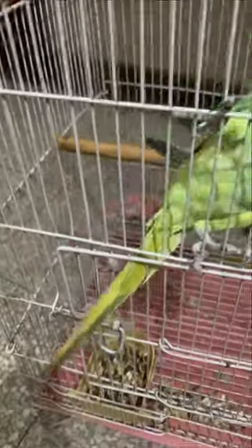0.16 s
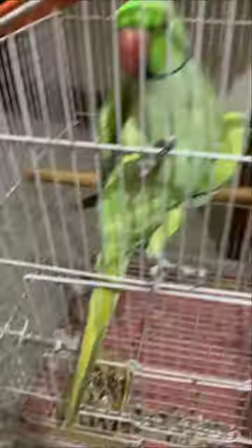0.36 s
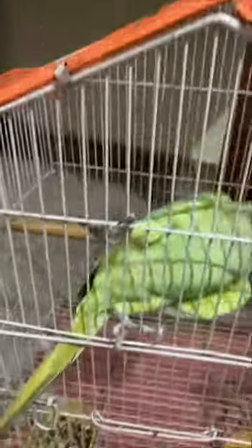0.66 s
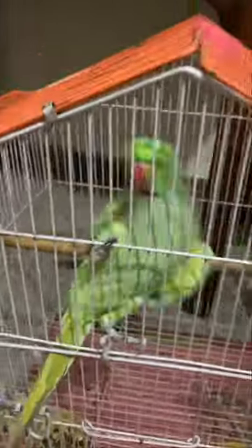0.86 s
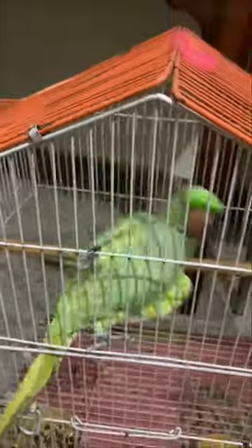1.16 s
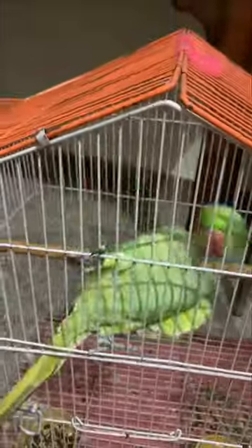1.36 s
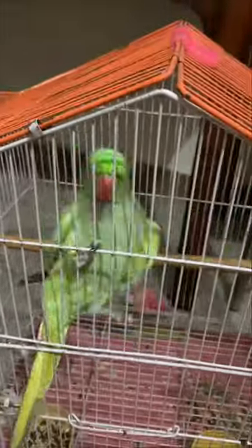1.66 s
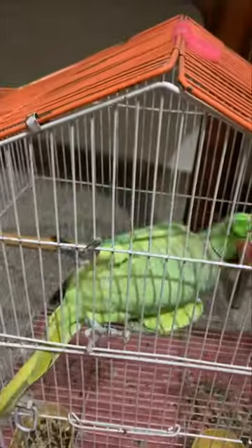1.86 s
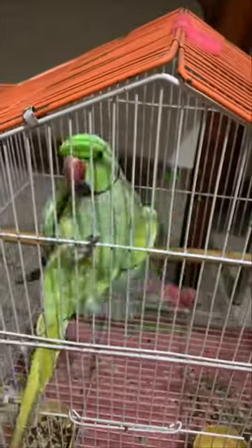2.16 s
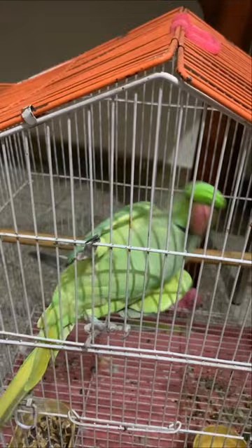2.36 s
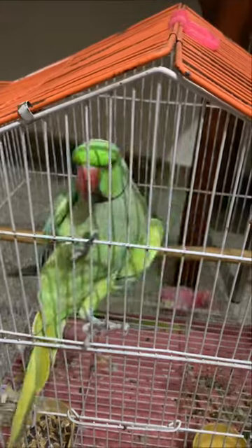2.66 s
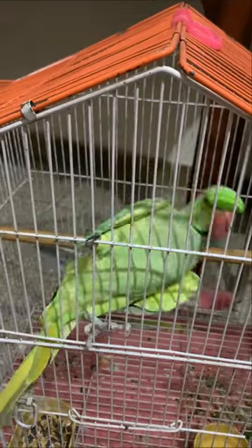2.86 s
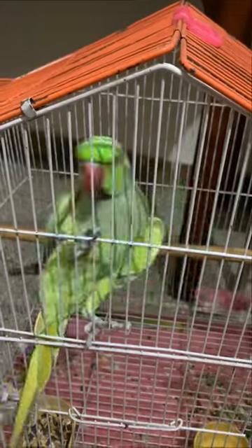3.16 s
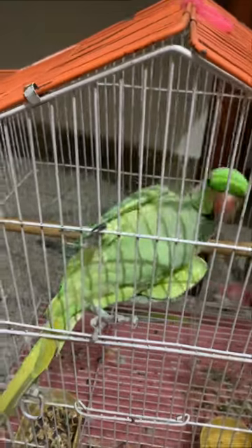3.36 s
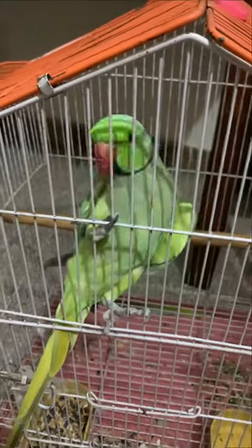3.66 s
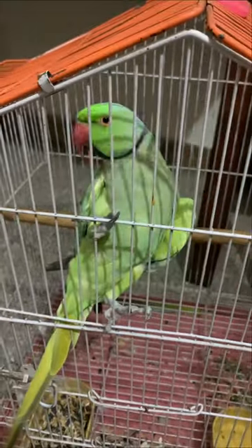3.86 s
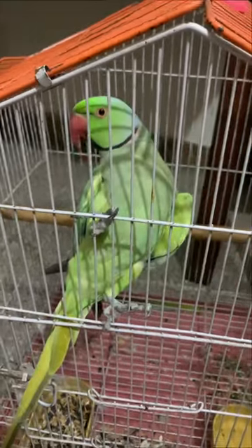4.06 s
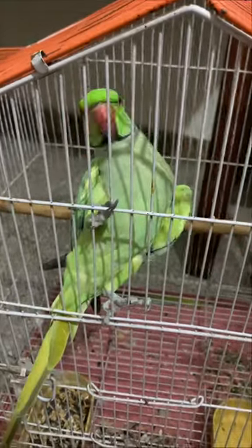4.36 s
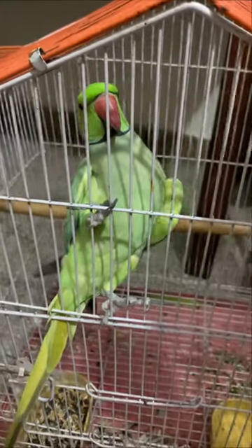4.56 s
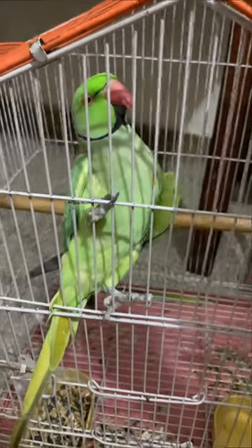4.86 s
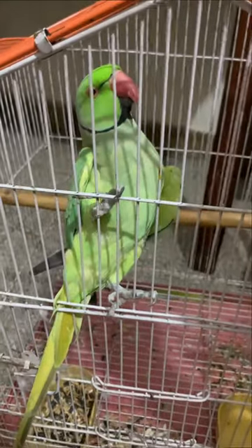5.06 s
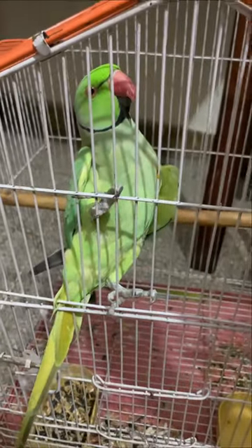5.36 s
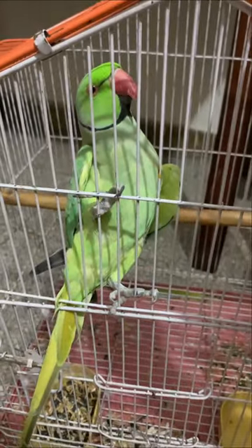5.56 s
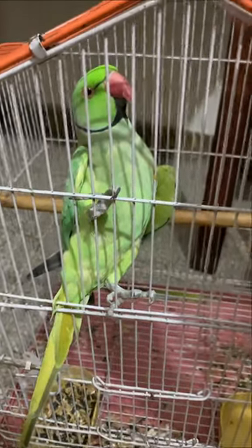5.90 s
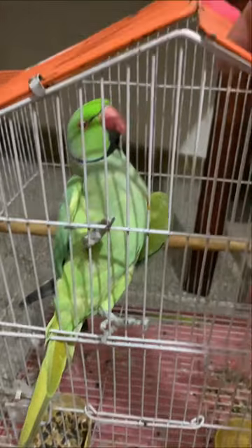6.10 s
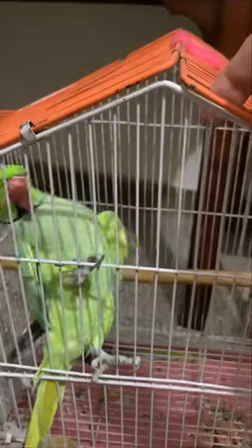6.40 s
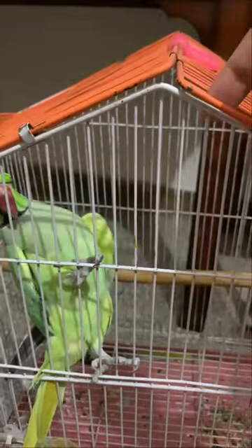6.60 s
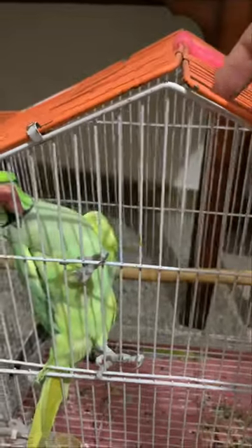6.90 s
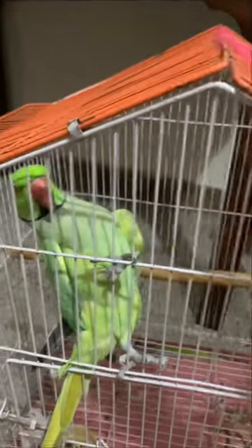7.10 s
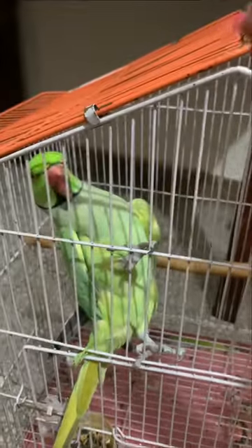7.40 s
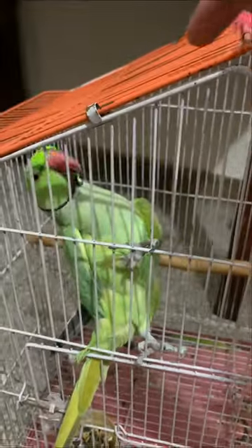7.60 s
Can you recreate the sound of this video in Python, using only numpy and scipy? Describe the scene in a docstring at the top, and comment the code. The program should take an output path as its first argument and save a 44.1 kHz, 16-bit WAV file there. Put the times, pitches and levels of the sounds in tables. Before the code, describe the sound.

Three loud, close parakeet screeches indoors, with a farther bird peeping and whistling quickly and a fan softly humming.

```python
"""A fan rushes low in a room. A distant bird peeps faintly, then whistles rows of flicked, arching,
near-pure notes. A caged parakeet screeches three times close to a phone: each cry opens with a cluck
of a few rough pulses, then glides as overtones shaped by the throat and combed by a wall echo.
The phone's gain control ducks under the cries and creeps back."""
import sys
import numpy as np
from scipy import signal
from scipy.fft import rfft, irfft, next_fast_len
from scipy.io import wavfile
from scipy.ndimage import uniform_filter1d, map_coordinates

SR = 44100
rng = np.random.default_rng(int(sys.argv[2]) if len(sys.argv) > 2 else 0)


def digitize_waveform(pressure):
    """Quantize a signal to 16-bit integers and store it at the path in sys.argv[1].

    Rows of a 2-D input are taken as channels; values are limited to [-1, 1].
    """
    field = np.atleast_2d(pressure).T
    bounded = np.clip(field, -1, 1)
    quanta = np.round(bounded * 32767).astype(np.int16)
    wavfile.write(sys.argv[1], SR, quanta)


N = 341334
TIME = np.arange(N) / SR

# fan air noise: f/Hz, density/dB
FAN_SPECTRUM = [(15, -55), (25, -19.5), (64, -7.5), (143, -10), (171, -10), (337, 1), (448, -11),
                (754, -20), (953, -16), (1520, -21), (2490, -29.5), (3070, -33), (5030, -44.5),
                (8250, -34.5), (12500, -79), (16200, -110), (22000, -120)]
# fan motor lines: f/Hz, level/dB
MOTOR_LINES = [(76, -58), (145, -54.5)]
# fan power common to both microphone ports: f/Hz, share
FAN_COHERENCE = [(60, .94), (130, .97), (300, .98), (640, .55), (1400, .55), (3100, .3), (6800, .7),
                 (12000, .7)]
# balance of that common part: f/Hz, left-right/dB
FAN_BALANCE = [(60, -0.5), (150, -2.5), (380, -4.0), (950, -5.5), (2380, -2.0), (5980, 0.0), (15000, 0.0)]
# port phase, fan and whistle overtones: f/Hz, left lead/rad
FAR_PHASE = [(0, 0), (400, .2), (1640, -.2), (2840, 2.2), (4050, 1.6), (5430, 3.3), (8000, 6.3),
             (16000, 12.6)]
# rising peeps: t/s, length/s, from/Hz, to/Hz, level/dB
PEEP_NOTES = [(0.344, 0.067, 2730, 3500, -62.5), (0.628, 0.074, 2840, 3400, -58.5),
              (1.075, .045, 2660, 3400, -62), (1.325, 0.068, 2920, 3290, -58.5),
              (4.572, 0.06, 2700, 3200, -62.5)]
# whistles: t/s, length/s, entry/Hz, crest/Hz, crest time/length, entry/dB, crest/dB, closing/dB,
# effort/dB, left-right/dB, left lead/rad, flick/dB, squeak/dB (None = not sung)
WHISTLE_NOTES = [ (1.485, 0.11, 2154, 3155, 0.42, -36.5, -48.5, -25.5, -24, -1, 0.97, -52, None),
                 (1.678, .095, 2795, 2918, 0.24, -26, -23.5, -28.5, -24, -2, 1.5, -43, None),
                 (1.851, .108, 2845, 3110, 0.44, -17, -31.5, -16, -22.5, -4, 3.5, -39.5, None),
                 (2.0, .11, 2800, 3102, .4, -30, -28, -31, -18.5, -3.7, 4.5, None, None),
                 (2.413, 0.15, 2800, 3064, 0.37, -34, -22, -33, -21.5, -5, 5, None, None),
                 (4.725, .09, 2204, 2690, 0.6, -29.5, -41, -35, -32, 2.6, 0.7, -51, -42),
                 (4.9, .098, 2677, 2825, 0.45, -29, -27, -28.5, -29.5, -0.5, 0.4, -42.5, -41),
                 (5.085, 0.092, 2820, 2886, 0.42, -31.5, -29, -31, -27.5, 1, 0.1, -42.5, -37.5),
                 (5.255, 0.1, 2825, 2970, 0.32, -34, -24, -32.5, -26, .5, 0.2, -38.5, -39),
                 (5.44, 0.089, 2910, 3015, 0.26, -31.5, -23.5, -30.5, -26, .6, 0.3, -38, -39),
                 (5.622, 0.093, 2960, 3050, 0.37, -27.5, -25.5, -28.5, -27.5, .6, -1, -36.5, -52),
                 (5.806, 0.11, 3010, 3150, .32, -26.5, -28.5, -30.5, -29.5, -1.5, -1.2, -38, -48),
                 (6.0, .094, 3030, 3165, 0.49, -29.5, -27, -32.5, -30.5, -8, 3.5, -39.5, -48),
                 (6.194, 0.076, 3140, 3248, 0.28, -27, -29.5, -30, -30, -2, 3, -38.5, -40.5),
                 (6.386, 0.091, 3156, 3205, 0.32, -30, -27.5, -35, -29, -.5, 2.5, -36.5, -35),
                 (6.581, 0.074, 3180, 3180, 0.093, -30.5, -33, -35, -27.5, .2, 2.5, -33.5, -45),
                 (6.766, 0.08, 3190, 3194, .25, -37.5, -31.5, -34.5, -27, -.2, 2.2, -35.5, -44.5),
                 (6.937, 0.099, 3150, 3690, .28, -39, -36.5, -34.5, -42, -2.5, -1.1, None, None), ]
# whistle overtones: multiple, level/dB
WHISTLE_OVERTONES = [(2, -27), (3, -42.5)]
# whistle breath: f/Hz, density/dB
BREATH_SPECTRUM = [(1800, -29.5), (3200, 1.5), (4200, -4), (5000, -9), (6200, -14.5), (8500, -16.5),
                   (10500, -24.5), (11500, -57)]
# throat clucks: t/s, level/dB, length/s, pulse rate/Hz
CLUCK_EVENTS = [(2.008, -2, 0.0069, 1471), (2.472, 7, 0.0081, 1428), (2.9543, 2.5, 0.0078, 1440)]
# air puff of a cluck: f/Hz, density/dB
PUFF_SPECTRUM = [(300, -31), (700, -7.5), (4300, 1.5), (10000, -9.5), (14000, -31.5)]
# throat, beak and microphone response: f/Hz, gain/dB
THROAT_GAIN = [(900, -38.5), (1350, -27), (1900, -33.5), (2300, -28), (2800, -20), (3500, -15), (4350, -20),
               (4950, -35.5), (5900, -25.5), (6800, -25.5), (7350, -36), (8800, -26), (10800, -34),
               (11400, -58.5), (12800, -41.5), (14800, -60.5)]
# one contour per cry: t/s, pitch/Hz, effort/dB
CRY_CONTOURS = [
    [(2.052, 1332, 0), (2.061, 1187, -3), (2.079, 1188, -5.5), (2.087, 1219, 0.5), (2.108, 1524, 1.5),
     (2.147, 1624, 1), (2.166, 1712, 0), (2.21, 1758, 0.5), (2.296, 1632, -4.5), (2.306, 1530, -9),
     (2.317, 1220, -24.5)],
    [(2.505, 1255, 0), (2.51, 1160, 6.5), (2.529, 1413, 7), (2.552, 1585, 5), (2.612, 1788, 4),
     (2.649, 1826, 5), (2.734, 1768, -4.5), (2.754, 1630, -9), (2.761, 1387, -19)],
    [(2.993, 1390, -11), (3.003, 1250, -3), (3.028, 1540, 4), (3.038, 1622, 7), (3.133, 1826, 4.5),
     (3.178, 1752, 2.5), (3.225, 1656, 1), (3.233, 1590, -7), (3.243, 1186, -19.5)],
]
# nearest wall's echo: f/Hz, gain/dB
WALL_GAIN = [(1000, -17.5), (1800, -14.5), (3500, -9), (5000, -9.5), (9000, -15)]
# port balance, parakeet: f/Hz, left-right/dB
NEAR_BALANCE = [(1050, -4), (1700, -0.5), (2250, -4), (2600, -11.5), (3150, -11), (3700, -2.5), (4200, 9),
                (4700, 8.5), (5300, -7.5), (5900, 0)]
# port phase, parakeet: f/Hz, left lead/rad
NEAR_PHASE = [(0, 0), (1000, .3), (2100, .2), (2850, -3.5), (3450, -2.4), (4050, -4.2), (8250, 0),
              (16000, 6.3)]
# room decay before scaling: f/Hz, t60/s
ROOM_T60 = [(300, 0.56), (3500, .5), (6000, 0.27), (9000, 0.34), (14000, 0.05)]


def amp(db):
    return 10 ** (np.asarray(db) / 20)


def unit(x):
    return x / np.sqrt(np.mean(x ** 2) + 1e-20)


def along(points, hz):
    """Table lookup on a log frequency axis."""
    f, v = np.transpose(points)
    return np.interp(np.log(hz + 1), np.log(f + 1), v)


def wobble(rate_hz):
    """Smooth random curve, knots at rate_hz."""
    return map_coordinates(rng.standard_normal(int(N * rate_hz / SR) + 4), [TIME * rate_hz])


def filtered(x, response):
    """Apply a complex frequency response."""
    m = next_fast_len(N + 8192)
    return irfft(rfft(x, m) * response(np.fft.rfftfreq(m, 1 / SR)), m)[..., :N]


def coloured(spectrum):
    """Shaped noise, rms 1."""
    return unit(filtered(rng.standard_normal(N), lambda hz: amp(along(spectrum, hz))))


def ports(x, balance, lead):
    """Two microphone ports: level and phase differ with frequency."""
    half = lambda hz: amp(along(balance, hz) / 2) * np.exp(.5j * np.interp(hz, *np.transpose(lead)))
    return filtered(x, lambda hz: np.array([half(hz), 1 / half(hz)]))


def fan(rush_db=-40.5):
    """Faintly patchy rush of air, alike on both ports in the bass, plus wavering motor lines."""
    z = signal.stft(rng.standard_normal((2, N)), nperseg=512)[2]
    patches = uniform_filter1d(rng.standard_normal(z.shape[1:]), size=5, axis=0)
    patches = unit(uniform_filter1d(patches, size=12, axis=1))
    a, b = signal.istft(z * amp(1.1 * patches), nperseg=512)[1][:, :N]
    colour = lambda hz: amp(along(FAN_SPECTRUM, hz))
    share = lambda hz: along(FAN_COHERENCE, hz)
    common = ports(filtered(a, lambda hz: colour(hz) * np.sqrt(share(hz))), FAN_BALANCE, FAR_PHASE)
    apart = filtered(np.array([b, b[::-1]]), lambda hz: colour(hz) * np.sqrt(1 - share(hz)))
    hum = sum(amp(db + 5.5 * wobble(4)) * np.sin(2 * np.pi * hz * np.cumsum(1 + .02 * wobble(3)) / SR)
              for hz, db in MOTOR_LINES)
    return amp(rush_db + 1.4 * wobble(2.4)) * unit(common + apart) + hum


def call(contour, attack_s, release_s, smooth_samples=200):
    """Sample span, pitch and gain from a contour: t/s, f/Hz, level/dB."""
    s, hz, db = np.transpose(contour)
    span = slice(int((s[0] - attack_s) * SR), int((s[-1] + release_s) * SR))
    t = TIME[span]
    edges = np.clip((t - t[0]) / attack_s, 0, 1) * np.clip((t[-1] - t) / release_s, 0, 1)
    pitch_hz = uniform_filter1d(np.interp(t, s, hz), size=smooth_samples)
    return span, pitch_hz, amp(np.interp(t, s, db)) * edges ** 2


def peep(start_s, length_s, from_hz, to_hz, db, fade_db=13):
    """Contour of a faint rising note."""
    return [(start_s, from_hz, db), (start_s + length_s, to_hz, db - fade_db)]


def room(x, t60_scale, gap_s=.006):
    """Stereo reverb; each frequency dies at its own rate."""
    hz, t, z = signal.stft(rng.standard_normal((2, SR * 2 // 3)), SR, nperseg=256)
    t60_s = t60_scale * along(ROOM_T60, hz)[:, None]
    tail = signal.istft(z * amp(-60 * t / t60_s), SR, nperseg=256)[1]
    delayed = np.pad(x, (int(gap_s * SR), 0))
    return signal.fftconvolve(delayed[None], tail / np.linalg.norm(tail[0]), axes=1)[:, :N]


def flick(whistle_s, entry_hz, db, length_s=.015, gap_s=.003, lead_in_s=.009):
    """Contour of the upward flick before a whistle, entered faintly from below."""
    start_s, from_hz = whistle_s - gap_s - length_s, 1.05 * entry_hz
    return [(start_s - lead_in_s, from_hz - 478.7, db - 22),
            (start_s, from_hz, db),
            (start_s + length_s, 1.29 * entry_hz, db - 6.5)]


def arch(start_s, length_s, entry_hz, crest_hz, crest_at, entry_db, crest_db, close_db):
    """Contour of a whistle: rounds up to its crest, falls ever faster; level drops, then fades."""
    sag, late_fall = .55, .15  # shares of the rise and of the crest pitch
    close_s, drop_s = .022, .005
    u = np.linspace(0, 1, num=60)
    rise = np.clip(1 - u / crest_at, 0, 1)
    fall = np.clip((u - crest_at) / (1 - crest_at), 0, 1)
    hz = crest_hz - (crest_hz - entry_hz) * (rise ** 2 + sag * fall ** 2)
    hz -= late_fall * crest_hz * fall ** 3.7
    close_at = 1 - close_s / length_s
    db = np.interp(u, [0, crest_at, close_at, close_at + drop_s / length_s, 1],
                   [entry_db, crest_db, close_db, close_db - 9.5, close_db - 17.5])
    return np.transpose([start_s + length_s * u, hz, db])


def far_bird(overtone_db=-3.5, breath_db=-27, wet_db=-16.5):
    """Near-pure whistles with weak overtones and breath, plus short sine glides, in reverb."""
    direct, mono, upper = np.zeros((2, N)), np.zeros(N), np.zeros(N)
    breath, flutter = coloured(BREATH_SPECTRUM), wobble(150)
    shimmer = amp(1.2 * wobble(40) + 1.1 * wobble(160))
    sides = np.array([[.5], [-.5]])
    glides = [peep(*note) for note in PEEP_NOTES]
    for *shape, effort_db, side_db, lead_rad, flick_db, squeak_db in WHISTLE_NOTES:
        span, hz, gain = call(arch(*shape), attack_s=.0068, release_s=.004)
        phase = 2 * np.pi * np.cumsum(hz) / SR
        gain *= np.sqrt(2) * shimmer[span]
        direct[:, span] += gain * amp(sides * side_db) * np.sin(phase + sides * lead_rad)
        mono[span] += gain * np.sin(phase)
        # effort varies less than the main tone's level
        effort = np.sqrt(2) * amp(effort_db) * (gain / gain.max()) ** .3
        overtones = sum(amp(db + overtone_db + 1.9 * k * flutter[span]) * np.sin(k * phase)
                        for k, db in WHISTLE_OVERTONES)
        upper[span] += effort * (overtones + amp(breath_db) * breath[span])
        start_s, length_s, entry_hz, crest_hz = shape[:4]
        if flick_db is not None:
            glides.append(flick(start_s, entry_hz, flick_db))
        if squeak_db is not None:
            glides.append(squeak(start_s + length_s, crest_hz, squeak_db))
    for contour in glides:
        span, hz, gain = call(contour, attack_s=.004, release_s=.0027)
        tone = np.sqrt(2) * gain * np.sin(2 * np.pi * np.cumsum(hz) / SR)
        direct[:, span] += tone * amp(2.7 * flutter[span])
        mono[span] += tone
    reverb = amp(wet_db) * room(mono + .5 * upper, t60_scale=.84)
    return direct + ports(upper, [(3000, 0)], FAR_PHASE) + reverb


def throat(hz, tilt_db=0, swell_db=np.zeros(1), top_hz=15700):
    """Harmonics of a pitch curve, each weighted by the throat at its own frequency."""
    phase = 2 * np.pi * np.cumsum(hz) / SR
    tone = np.zeros(len(hz))
    for k in range(1, 14):
        db = along(THROAT_GAIN, k * hz) + (k - 1.5) * tilt_db + np.roll(swell_db, k * len(hz) // 14)
        tone += amp(db) * (k * hz < top_hz) * np.cos(k * phase)
    return tone


def clucks(puff, jitter, puff_db=-12.5):
    """A few rough throat pulses and a puff of air before each cry."""
    voice = np.zeros(N)
    for start_s, db, length_s, hz in CLUCK_EVENTS:
        span = slice(int(start_s * SR), int((start_s + length_s) * SR))
        swell = np.sin(np.pi * (TIME[span] - start_s) / length_s).clip(0) ** 1.1
        pulses = throat(hz * (1 + .2 * jitter[span]))
        voice[span] += amp(db) * swell * (pulses + amp(puff_db) * puff[span])
    return voice


def cries(breath, jitter, gain_db=15.5, breath_db=-27, hoarse_s=.035, dull_below_db=-6):
    """Screeches: hoarse at onset, then clear overtones that dull at low effort."""
    voice = np.zeros(N)
    shimmer, rasp, waver, swell_db = wobble(90), wobble(350), wobble(35), 1.3 * wobble(60)
    for contour in CRY_CONTOURS:
        span, hz, effort = call(contour, attack_s=.0016, release_s=.0073, smooth_samples=400)
        hoarse = np.exp(-((TIME[span] - contour[0][0]) / hoarse_s) ** 2)
        tilt_db = .18 * np.minimum(20 * np.log10(effort + 1e-4) - dull_below_db, 0)
        pitch_hz = hz * (1 + (.0004 + .015 * hoarse) * jitter[span] + .002 * waver[span])
        rough_db = .54 * shimmer[span] + 2.9 * hoarse * rasp[span]
        tone = throat(pitch_hz, tilt_db, swell_db[span]) * amp(rough_db)
        voice[span] += amp(gain_db) * effort * (tone + amp(breath_db) * hoarse * breath[span])
    return voice


def wall_echo(x, delay_s=.005102):
    """Direct sound plus one inverted reflection: combs the gliding overtones."""
    return filtered(x, lambda hz: 1 - amp(along(WALL_GAIN, hz)) * np.exp(-2j * np.pi * hz * delay_s))


def parakeet(wet_db=-21.5):
    """Close bird: clucks and cries, wall echo, light reverb."""
    breath, puff, jitter = coloured(THROAT_GAIN), coloured(PUFF_SPECTRUM), wobble(500)
    voice = clucks(puff, jitter) + cries(breath, jitter)
    return ports(wall_echo(voice), NEAR_BALANCE, NEAR_PHASE) + amp(wet_db) * room(voice, t60_scale=.9)


def gain_control(x, limit_db=-14, quick_db_per_s=8, slow_db_per_s=1.19, quick_range_db=3.5):
    """Ducks over the limit; recovers a little quickly, the rest slowly."""
    power = np.abs(uniform_filter1d(np.mean(x ** 2, axis=0), size=900))
    excess_db = np.maximum(10 * np.log10(power + 1e-12) - limit_db, 0)
    recover = lambda db, rate: np.maximum.accumulate(db + rate * TIME) - rate * TIME
    quick_db = recover(excess_db, quick_db_per_s)
    slow_db = recover(excess_db - quick_range_db, slow_db_per_s)
    cut_db = uniform_filter1d(np.maximum(quick_db, slow_db).clip(0), size=1800)
    return x * amp(-cut_db)


def squeak(start_s, crest_hz, db, length_s=.012, fade_db=8):
    """Contour of the falling squeak as a whistle shuts."""
    return [(start_s, 1.07 * crest_hz, db), (start_s + length_s, .96 * crest_hz, db - fade_db)]


def scene():
    return parakeet() + far_bird() + fan()


def record(dry, ceiling=.95, top_hz=15800):
    """Phone: gain control, soft clip, low-pass."""
    ducked = gain_control(dry)
    rounded = ducked / (1 + np.abs(ducked / ceiling) ** 6) ** (1 / 6)
    return filtered(rounded, lambda hz: hz < top_hz)


dry = scene()
out = record(dry)
digitize_waveform(out)
```